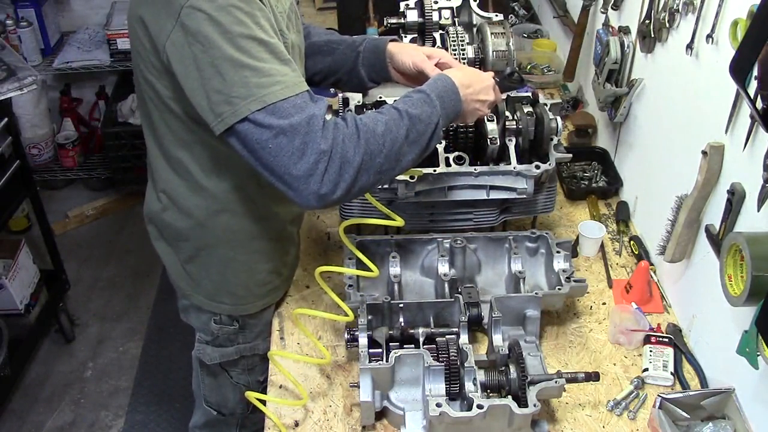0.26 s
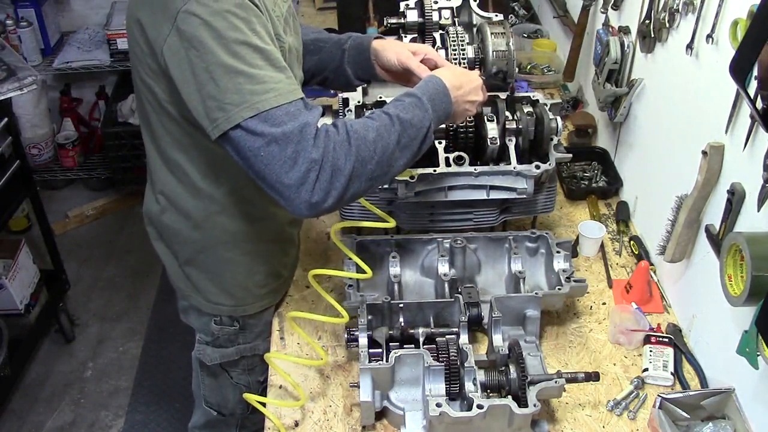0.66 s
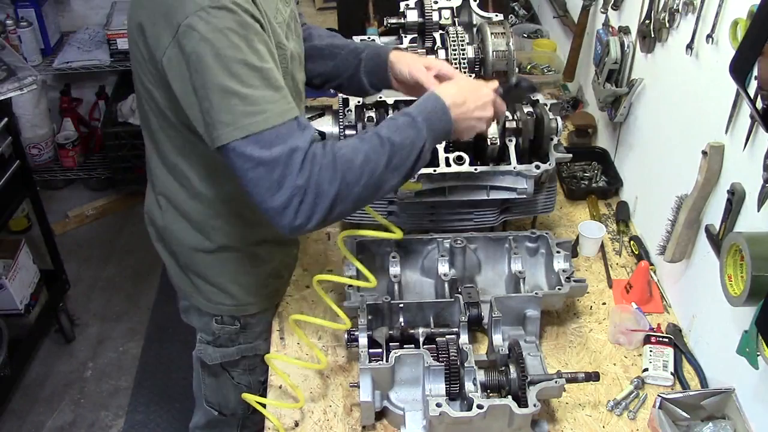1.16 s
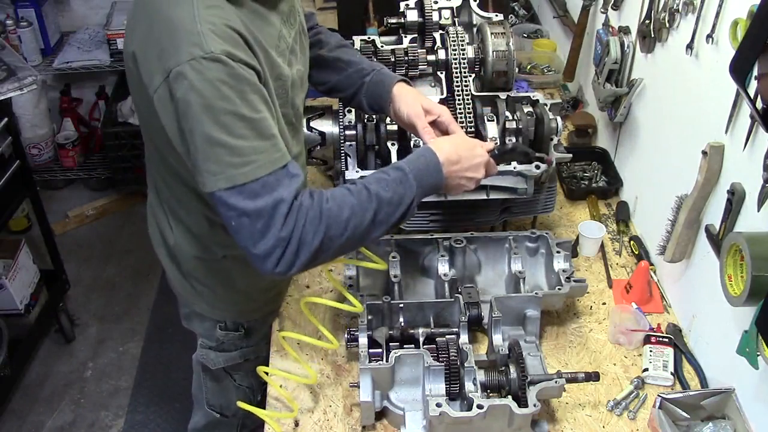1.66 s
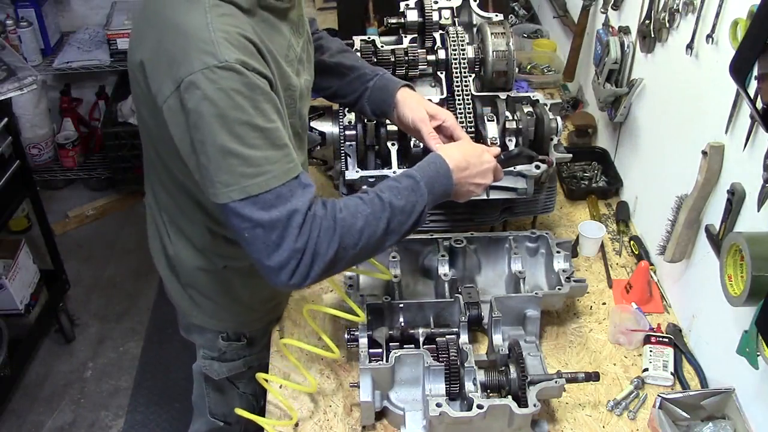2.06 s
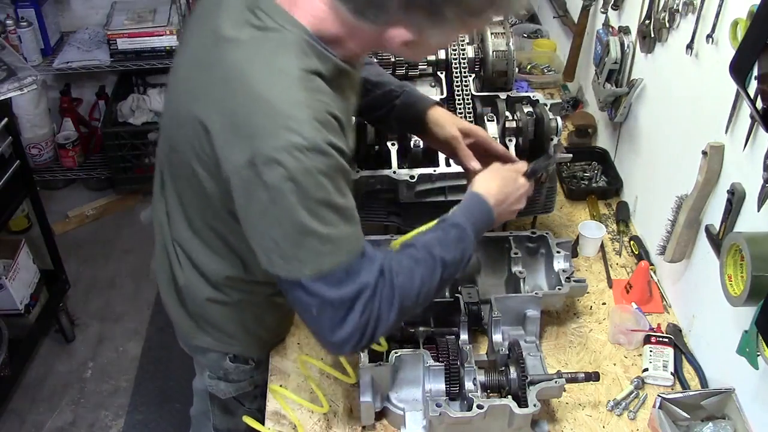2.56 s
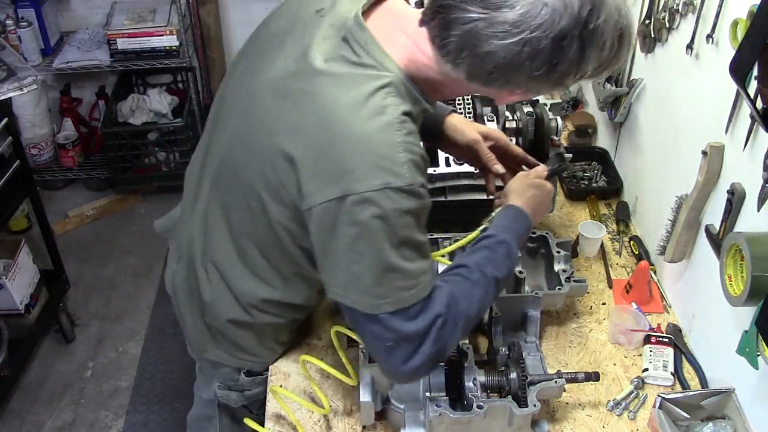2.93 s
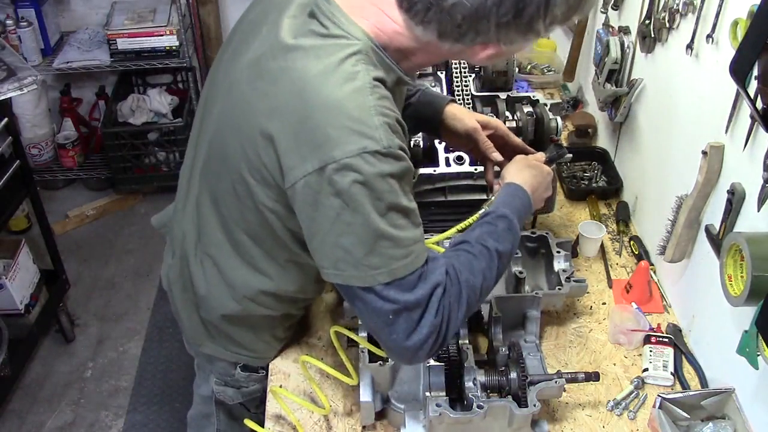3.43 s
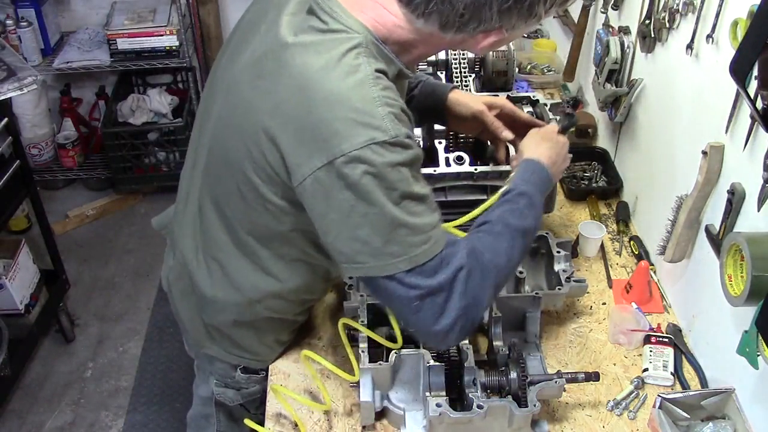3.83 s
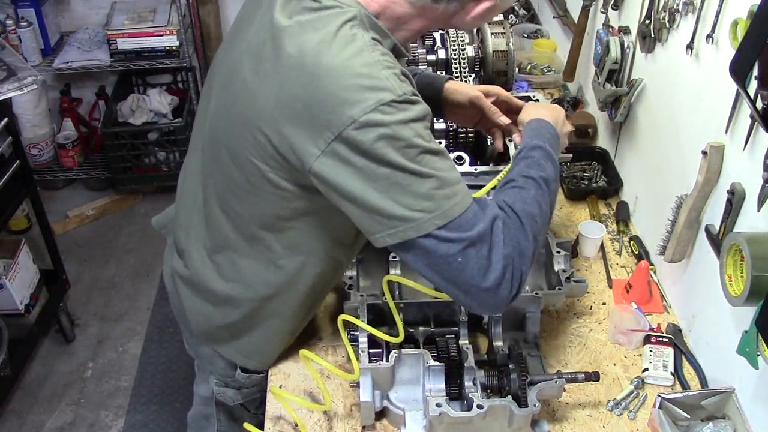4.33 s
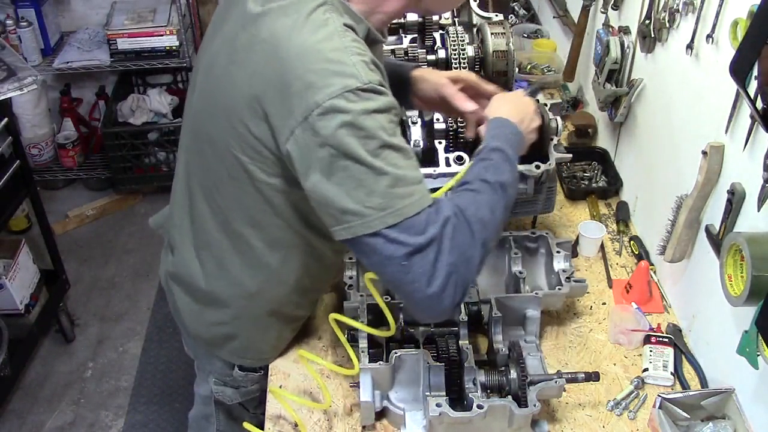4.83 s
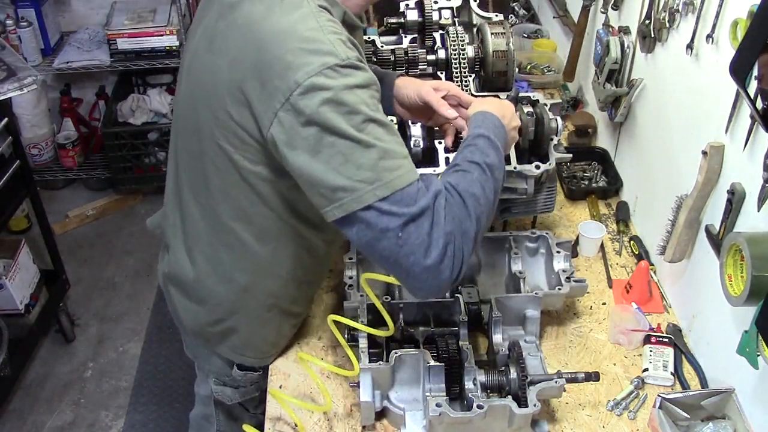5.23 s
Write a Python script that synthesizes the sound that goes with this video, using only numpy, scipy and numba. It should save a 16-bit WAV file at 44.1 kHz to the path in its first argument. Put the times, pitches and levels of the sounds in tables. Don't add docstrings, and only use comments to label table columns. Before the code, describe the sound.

The sound starts already in a forceful compressed-air blast, bright and hissy, a metre from a camera's stereo microphones. Until about 1.1 s the nozzle sweeps over holes in a metal casing: the hiss surges and drops in quick uneven passes, rougher on edges, with a low air thump and sharp high whistles near 0.47 s, then chirps around 0.67, 0.82 and 0.94 s. A short garage echo follows. From 1.4 to 2.2 s comes a long, fairly even blast with a faint rising whistle near 1.65 s. Quiet room rumble returns; cloth rubs around 2.6 s, with small scrapes and a firm knock at 2.85 s. A blast at 3.17 s begins muffled and ringing, swells loud near 3.5 s and fades by 3.8 s. Soft taps fall near 4.0 and 4.3 s. A short blast spans 4.55-4.8 s, a faint tick comes at 5.24 s, and a brief puff starts at 5.45 s. Background tone ducks under the blasts.

```python
import sys
import numpy as np
from scipy import signal
from scipy.fft import rfft, irfft, next_fast_len
from scipy.io import wavfile
from scipy.ndimage import uniform_filter1d, minimum_filter1d
from numba import njit

SR = 44100
rng = np.random.default_rng(int(sys.argv[2]) if len(sys.argv) > 2 else 0)


def gain_from_db(level_db):
    decades = np.asarray(level_db, float) / 20
    return 10 ** decades


def store_pcm(level_fs):
    pcm = np.round(np.clip(level_fs, -1, 1) * 32767).astype(np.int16)
    wavfile.write(sys.argv[1], SR, np.atleast_2d(pcm).T)


N = 241932
FAST = next_fast_len(N)
T = np.arange(N) / SR
HZ = np.maximum(np.arange(FAST // 2 + 1) * SR / FAST, 1)


def on_hz(table, hz=HZ):
    table_hz, values = np.transpose(table)
    return np.interp(np.log(hz), np.log(table_hz), values)


def on_time(table):
    return np.interp(T, *np.transpose(table))


def unit(x):
    return x / np.sqrt(np.mean(x ** 2))


def noise(gain):
    return irfft(rfft(rng.standard_normal(FAST)) * gain, FAST)[:N]


def peak(hz, width_hz):
    return 1 / (1 + ((HZ ** 2 - hz ** 2) / (HZ * width_hz)) ** 2)


def band_share(centres_hz, k):
    return np.sqrt(np.interp(np.log(HZ), np.log(centres_hz), np.arange(len(centres_hz)) == k))


def gate(t0, t1, edge):
    if t0 == 0:
        t0 = -1
    return np.clip(np.minimum(T - t0, t1 - T) / edge + .5, 0, 1)


def walk(rate):
    k = int(SR / rate)
    steps = np.repeat(rng.standard_normal(N // k + 1), k)
    return unit(uniform_filter1d(uniform_filter1d(steps, k), k)[:N])


# frequency in Hz, level in dB per Hz.
TONE = [(15, -35.5), (25, -6.5), (32, -23.5), (70, -13), (206, -17), (242, -14), (363, -12.5), (463, -18),
        (503, -17.5), (818, -20), (2910, -30), (4140, -34.5), (16000, -47)]
# frequency in Hz, left-right difference in dB.
TONE_SIDE = [(60, -12.5), (110, 0), (200, -3), (380, -7), (700, -5), (1290, -9), (2380, -9.5), (4400, -8.5),
             (8120, -9), (15000, -2)]


def room_tone():
    colour = gain_from_db(on_hz(TONE)) * (HZ > 20)
    centres_hz = 40 * 2. ** np.arange(9)
    out = 0
    for k in range(9):
        band = colour * band_share(centres_hz, k)
        mid, side = noise(band), noise(band * gain_from_db(on_hz(TONE_SIDE)))
        out = out + gain_from_db(1.1 * walk(rate=6)) * np.array([mid + side, mid - side])
    return out * gain_from_db(-49) / np.sqrt(np.mean(out.mean(axis=0) ** 2))


# frequency in Hz, width in Hz, level in dB.
RUMBLE = [(58, 8, -61.5), (76.9, 8, -61.5)]
# centre in seconds, level in dB, length in seconds, frequency in Hz.
PUFFS = [
    (0.462, -19, .03, 55),
    (1.048, -37, 0.048, 110.6),
    (4.555, -38.5, 0.027, 81),
]


def low_air():
    drone = sum(unit(noise(peak(hz, width_hz))) * gain_from_db(db) for hz, width_hz, db in RUMBLE)
    out = np.array([drone, drone])
    for s, db, length, hz in PUFFS:
        push = np.exp(-((T - s) / length) ** 2 * 4) * np.sin(2 * np.pi * hz * (T - s))
        out = out + gain_from_db(db) * push * np.array([[1.2], [.8]])
    return out


# time in seconds, hiss at the camera in dB,
# glance from 0 (square on) to 1 (skimming an edge).
SWEEP = [
    [(0.0, -9, 0.23), (.075, -12.5, 0.074), (.165, -5.5, 0.016), (.2, -14.5, 0.28), (.23, -17.5, 0.14),
     (.285, -23.5, 0.45)],
    [(.335, -17.5, 0.84), (.39, -13.5, 1), (.415, -15.5, 0.48), (.452, -13, 0.57), (.47, -23, 0.47)],
    [(.54, -22, 0.36), (.6, -23, 0.58), (.64, -22.5, 0.43), (.7, -15, 0.69)],
    [(.716, -4.5, 0.07), (.775, -8.5, .25), (.81, -11.5, 0.28), (.88, -6.5, 0.27), (.9, -13, 0.44)],
    [(.96, -17, 0.55), (1.0, -17.5, 0.78), (1.045, -18, .75), (1.08, -28.5, 0.3)],
]
# time in seconds, hiss at the camera in dB, glance from 0 to 1.
AIMED = [
    [(1.39, -56.5, 1), (1.43, -21, .45), (1.48, -26.5, 0.84), (1.55, -26, 0.28), (1.585, -19.5, 0.38),
     (1.67, -20, 0.54), (1.72, -15, 0.22), (2.19, -15.5, 0.46), (2.24, -28.5, 0.35)],
    [(3.16, -60, .5), (3.22, -24.5, 0.13), (3.44, -23.5, 0.16), (3.5, -8.5, 0), (3.6, -6, 0),
     (3.635, -7.5, .03), (3.68, -16.5, 0.21), (3.79, -32, 0.18)],
    [(4.53, -77.5, .9), (4.556, -27.5, 0.53), (4.578, -15, 0.6), (4.66, -14.5, 0.24), (4.7, -22.5, 0.62),
     (4.79, -37, 0.33)],
    [(5.44, -81, .5), (5.456, -32.5, 0.2), (5.468, -17, 0.15), (5.486, -11.5, 0)],
]


def nozzle_path():
    s, hiss_db, glance = np.transpose(np.concatenate(SWEEP + AIMED))
    return np.interp(T, s, hiss_db), np.interp(T, s, glance)


# frequency in Hz, level in dB per Hz.
NOZZLE = [(60, -48), (130, -21), (250, -19.5), (700, -11.5), (1300, -10), (3000, 0.5), (6000, 1),
          (10000, 4.5), (12000, 2.5), (15000, 2), (18000, -22)]
SEATED = [
    (0, 0.12),
    (.2, 0.34),
    (1.06, 1.55),
    (3.1, 3.52),
    (5.4, 6.4),
]
CLOSING = [
    (2.215, 2),
    (3.67, 4.5),
    (4.69, 4.9),
]


def hiss(glance):
    edge_s = 0.056
    splash_db = -25.5 + 22 * glance
    body_db = -10.5 + 10 * glance
    fizz_db = -0.23 - 11 * sum(gate(t0, t1, edge_s) for t0, t1 in SEATED)
    fizz_db = fizz_db - 13 * sum(gate(t0, t1, edge_s) for t0, t1 in CLOSING)
    centres_hz = [550, 1900, 6200, 13000]
    edges_hz = [(250, 1100), (1200, 3000), (4200, 9000), (11000, 15500)]
    colour, eddies, out = gain_from_db(on_hz(NOZZLE)), walk(rate=100), 0
    for k, db in enumerate([splash_db, body_db, 0, fizz_db]):
        low, high = edges_hz[k]
        power = 2 * np.sum(colour[(HZ > low) & (HZ < high)] ** 2) / FAST
        flutter = gain_from_db(1.2 * eddies + 1.15 * walk(rate=22))
        out = out + noise(colour * band_share(centres_hz, k)) / np.sqrt(power) * gain_from_db(db) * flutter
    return out


# from and to in seconds, pitch in Hz, level in dB
HOLE_RINGS = [(0, 1.08, 1410, -20), (0, .06, 4760, -9), (0, 0.2, 5520, -7.5), (0, 0.22, 6570, -1),
              (.11, 0.17, 4200, -2), (.3, .36, 1440, -3.5), (0.321, .39, 2850, -2), (.3, .47, 12700, -1.5),
              (.38, 0.45, 3440, 2), (0.389, 0.57, 10500, 5), (.48, 0.59, 3410, 1), (.51, 0.74, 10130, -3),
              (.674, 1.04, 3390, -5.5), (.71, 0.67, 7200, 2), (.71, 0.86, 10460, -1),
              (.84, 0.96, 11100, -1), (.92, 1.2, 3365, -0.5),
              (1.39, 1.465, 2460, 1), (1.7, 1.64, 2420, -4.5), (1.56, 2, 7400, -12), (1.6, 1.705, 3500, -2),
         (1.52, 1.6, 4280, -7), (1.5, 2.5, 1430, -21), (1.59, 2.13, 10000, 0.4), (1.685, 1.76, 10230, 9),
         (3.17, 3.505, 2013, -2), (3.17, 3.505, 2267, .6), (3.43, 3.62, 3760, -5), (3.19, 3.51, 5550, -5.5),
         (3.19, 3.56, 6370, -3), (3.9, 3.56, 6180, -4), (3.17, 3.645, 9840, -0.5),
         (3.53, 3.645, 10700, 0.2), (4.55, 4.67, 9600, -3), (5.45, 5.6, 2010, -3), (5.46, 5.6, 2900, -3.5),
         (5.45, 5.6, 9400, 0.5)]


def ringing_holes():
    out = 0
    for t0, t1, hz, db in HOLE_RINGS:
        ring = unit(noise(peak(hz, width_hz=0.1 * hz)))
        out = out + ring * gain_from_db(db) * gate(t0, t1, edge=0.013)
    return out


BLASTS = [
    (0, 1.1),
    (1.396, 2.225),
    (3.165, 3.81),
    (4.535, 4.8),
    (5.445, 5.59),
]


def jet():
    hiss_db, glance = nozzle_path()
    valve = sum(gate(t0, t1, edge=0.037) for t0, t1 in BLASTS)
    return (hiss(glance) + ringing_holes()) * gain_from_db(hiss_db) * valve


# delay in seconds, level in dB.
BOUNCES = [(.0007, -32), (.0016, -21), (.0043, -14), (.0068, -16.5), (.0095, -14.5)]
# frequency in Hz, level in dB, t60 in seconds.
CASING = [(1505, -16, 0.53), (6550, -25.5, 0.37)]


def close_by(x):
    ir = np.zeros(SR // 2)
    ir[0] = 1
    for s, db in BOUNCES:
        ir[int(s * SR)] += gain_from_db(db)
    ir /= np.sqrt(np.sum(ir ** 2))
    t = T[:len(ir)]
    for hz, db, t60 in CASING:
        ir = ir + gain_from_db(db - 36 - 60 * t / t60) * np.sin(2 * np.pi * hz * t)
    return signal.fftconvolve(x, ir)[:N]


# frequency in Hz, t60 in seconds.
ROOM_T60 = [(200, .55), (1500, 0.58), (3200, 0.5), (5500, .47), (8000, 0.37), (11000, .3), (15000, 0.26)]
# frequency in Hz, level in dB.
ROOM_COLOUR = [(200, 3.5), (900, -3), (1900, 1), (3100, -6), (5500, -0.5), (9000, -3.5), (12000, -6),
               (15500, -7.5)]
# frequency in Hz, left-right difference in dB.
ROOM_SIDE = [(200, 0), (1500, -22.5), (3500, -15), (6500, -9), (12000, -7)]


def garage(x):
    centres_hz = 125 * 2. ** np.arange(8)
    onset = np.clip((T - .003) / 0.0074, 0, 1)

    def echo(colour_db):
        tail = 0
        for k, hz in enumerate(centres_hz):
            tail = tail + noise(band_share(centres_hz, k)) * gain_from_db(-60 * T / on_hz(ROOM_T60, hz))
        return irfft(rfft(tail * onset * (T < 1.5), FAST) * gain_from_db(colour_db), FAST)

    mid = echo(on_hz(ROOM_COLOUR))
    side = echo(on_hz(ROOM_COLOUR) + on_hz(ROOM_SIDE))
    scale = gain_from_db(-13) / np.sqrt(np.sum(mid ** 2))
    return np.array([signal.fftconvolve(x, scale * (mid + sign * side))[:N] for sign in (1, -1)])


# peak in seconds, swell in seconds, pitch in Hz,
# glide in Hz, rms level at the camera in dB.
WHISTLES = [
    (.463, 0.015, 10180, -300, 8.5),
    (.477, 0.0043, 9830, -100, -2.5),
    (.49, .006, 3440, -20, 5.5),
    (.658, .009, 3206, 24.5, -6.5),
    (.674, .011, 3362, 46.5, 3),
    (.815, .006, 9800, 141, -1),
    (0.827, 0.0048, 10230, 61, 3),
    (.941, 0.016, 3390, -220, 4),
    (1.66, .045, 3425, 330, -15),
]


def whistles():
    out, wobble = 0, walk(rate=300)
    for s, swell_s, centre_hz, glide_hz, db in WHISTLES:
        along = np.clip((T - s) / swell_s, -1, 1)
        hz = (centre_hz + glide_hz * along / 2) * (1 + 0.0019 * wobble)
        level = np.sqrt(2) * gain_from_db(db + 0.85 * wobble) * np.cos(np.pi / 2 * along)
        out = out + level * np.sin(2 * np.pi * np.cumsum(hz) / SR)
    return out


# time in seconds, level in dB.
SLEEVE = [
    (2.45, -75.5),
    (2.56, -55.5),
    (2.66, -52.5),
    (2.75, -59),
    (2.83, -65),
    (2.95, -72.5),
]
# start in seconds, level in dB, t60 in seconds, tone in Hz,
# width in Hz.
TOUCHES = [
    (2.678, -60.5, 0.034, 7000, 3000),
    (2.722, -49, .03, 7430, 2980),
    (2.746, -50, 0.022, 6500, 3020),
    (2.838, -50.5, .04, 4500, 4050),
    (2.851, -39, 0.061, 3255, 1780),
    (3.974, -49, 0.041, 2510, 3002),
    (4.31, -51, .05, 2500, 2000),
    (2.851, -38.5, 0.1, 1250, 496),
    (2.855, -58, .1, 8000, 494),
    (5.241, -52, 0.061, 8000, 14100),
]


def hands():
    cloth = unit(noise(peak(6100, 6000) + 2.9 * peak(2300, 3000)))
    grain = gain_from_db(on_time(SLEEVE) + 2.3 * walk(rate=90))
    out = cloth * grain * gate(SLEEVE[0][0], SLEEVE[-1][0], edge=0.038)
    for s, db, t60, hz, width_hz in TOUCHES:
        fade = np.clip((T - s) / 0.0011, 0, 1) * gain_from_db(-60 * np.maximum(T - s, 0) / t60)
        out = out + unit(noise(peak(hz, width_hz))) * gain_from_db(db) * fade
    return out


@njit
def follow(target, attack, release):
    out, e = np.empty(len(target)), target[0]
    for i in range(len(target)):
        e += (target[i] - e) * (attack if target[i] < e else release[i])
        out[i] = e
    return out


def gain_control(x):
    ceiling_db, squeeze = -17, 0.89
    detect_s, attack_s, hold_s = .012, 0.01, 0.029
    level_db = 10 * np.log10(uniform_filter1d(x ** 2, int(detect_s * SR)) + 1e-12)
    hold = 2 * int(hold_s * SR / 2) + 1
    wanted = minimum_filter1d(-squeeze * np.maximum(level_db - ceiling_db, 0), hold, origin=hold // 2)
    release_s = np.where((T > 2.15) & (T < 2.4), 0.13, 0.028)
    return follow(wanted, 1 / (attack_s * SR), 1 / (release_s * SR))


def scene():
    blast = jet() + whistles() + hands()
    near = close_by(blast)
    lag = 0.11 * np.gradient(near)
    return np.array([near + lag, near - lag]) + garage(blast) + room_tone() + low_air()


def roll_off(x):
    return signal.sosfilt(signal.butter(12, 15940, fs=SR, output="sos"), x)


def record(dry):
    bass_hz, offset = 105, .0102
    gain_db = gain_control(dry.mean(axis=0))
    bass = irfft(rfft(dry, FAST) / (1 + (HZ / bass_hz) ** 4), FAST)[:, :N]
    bass_cut = gain_from_db(.55 * gain_db) - 1
    x = (dry + bass * bass_cut + offset) * gain_from_db(gain_db)
    soft = np.tanh(.9 * x) / .9
    top_cut = signal.ellip(10, .1, 40, 15900, fs=SR, output="sos")
    mix = signal.sosfiltfilt(top_cut, soft)
    return roll_off(mix)


dry = scene()
out = record(dry)
store_pcm(out)
```